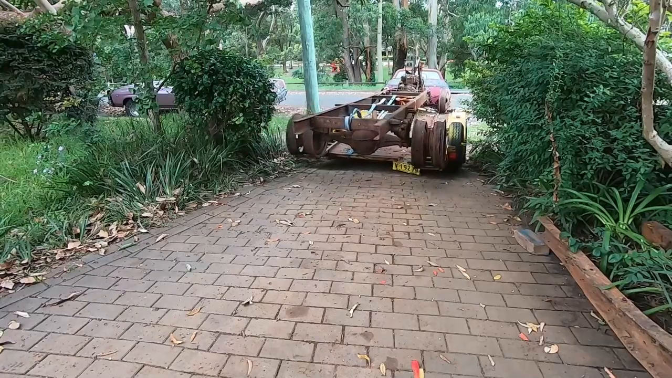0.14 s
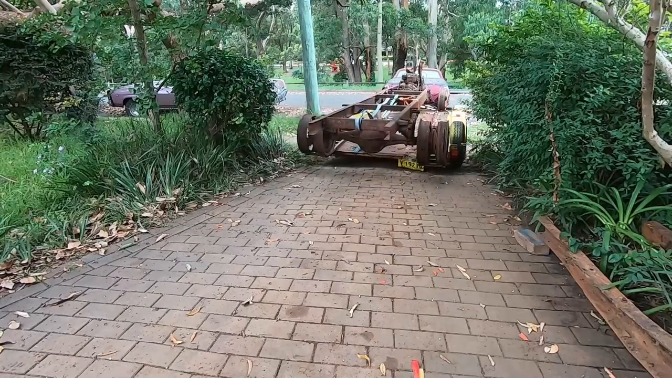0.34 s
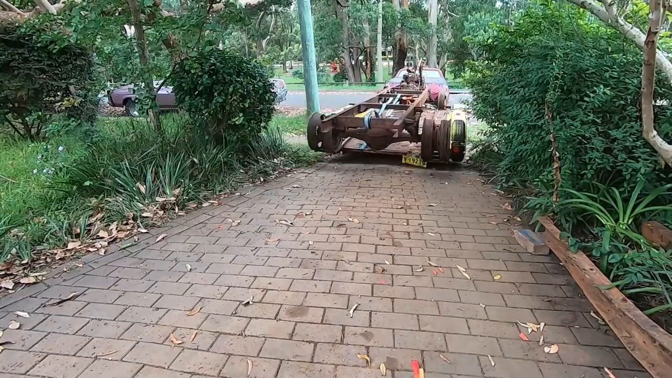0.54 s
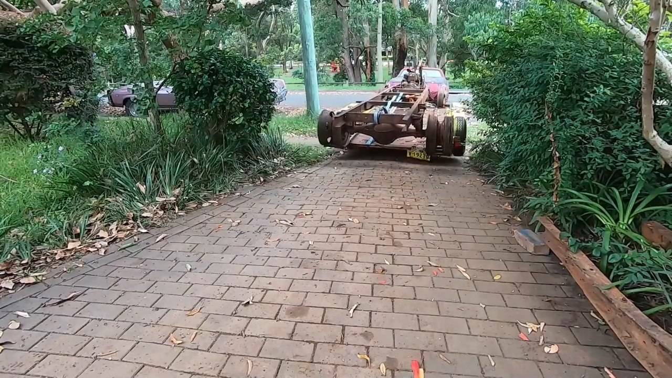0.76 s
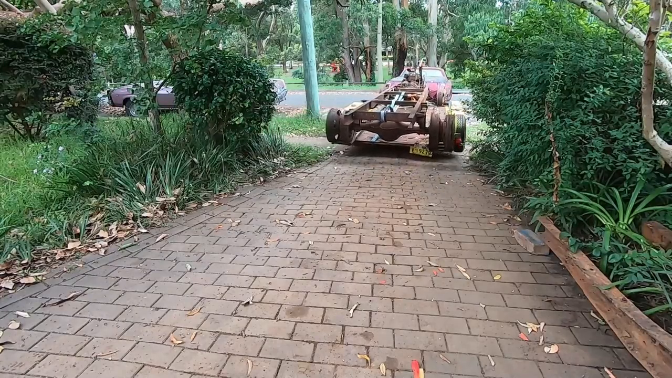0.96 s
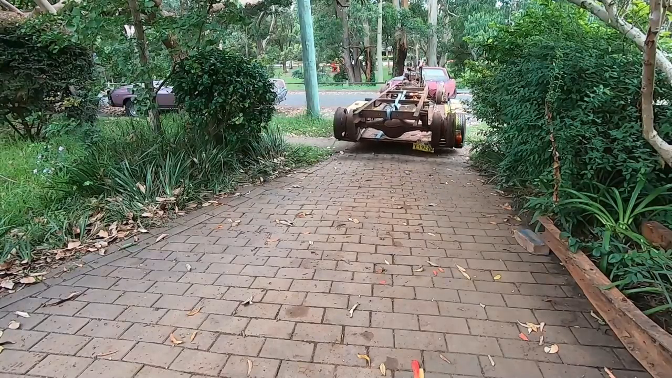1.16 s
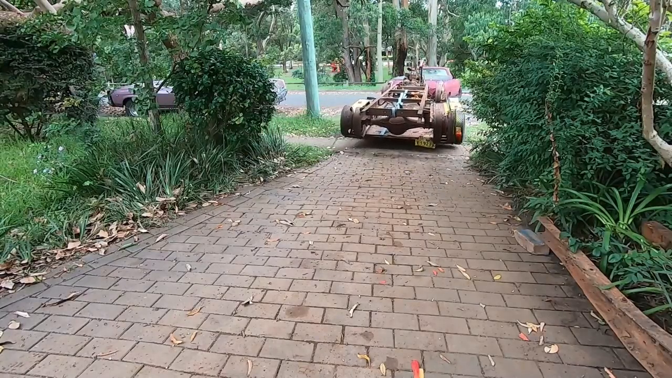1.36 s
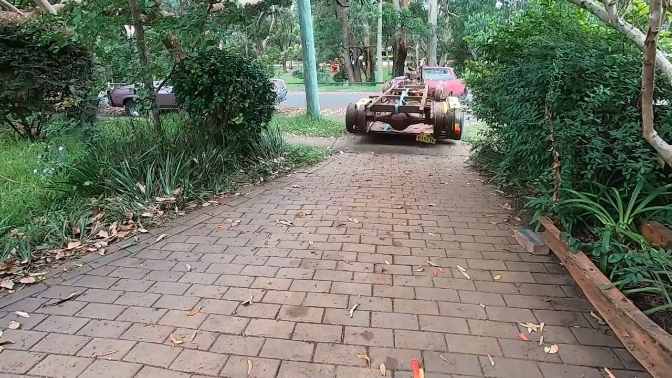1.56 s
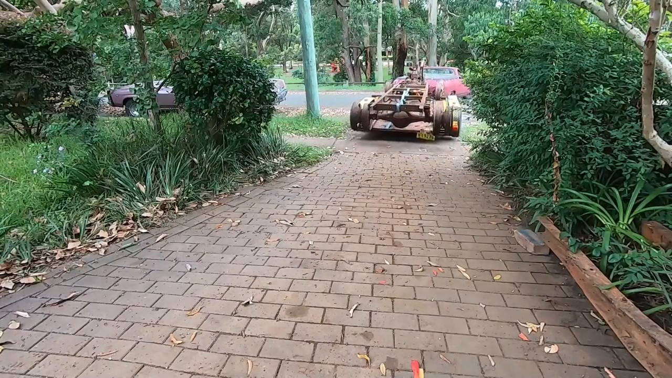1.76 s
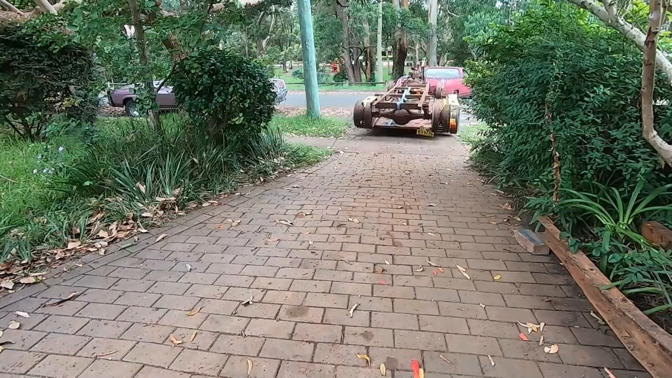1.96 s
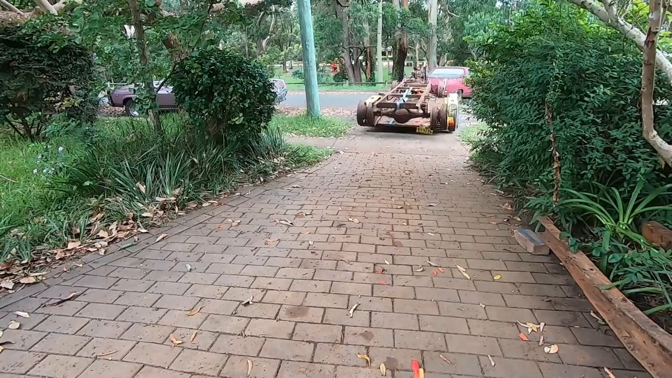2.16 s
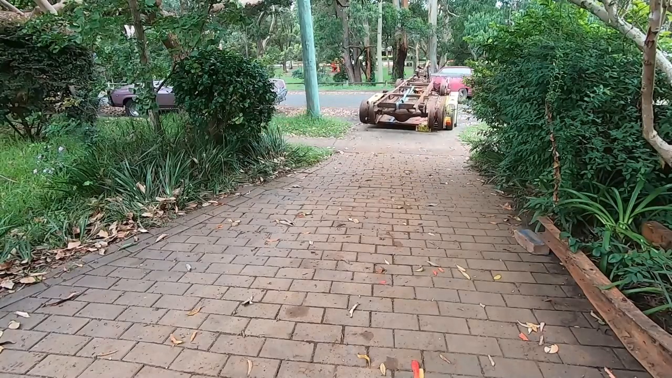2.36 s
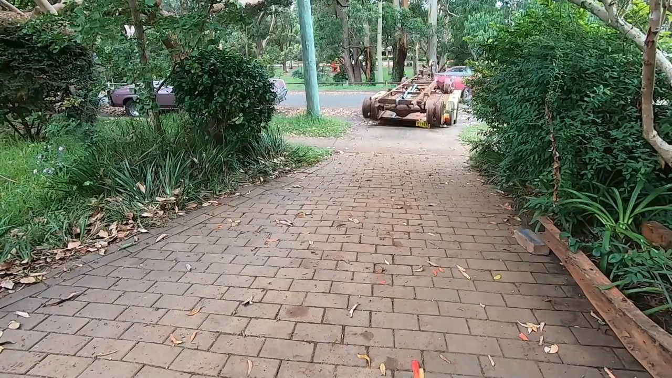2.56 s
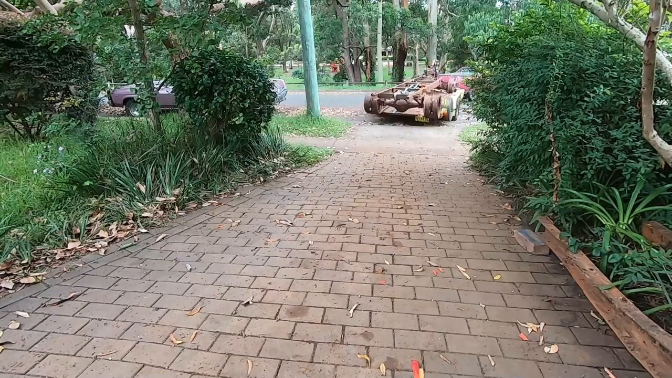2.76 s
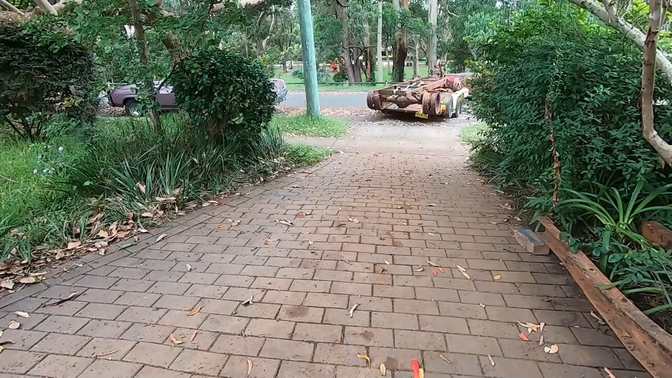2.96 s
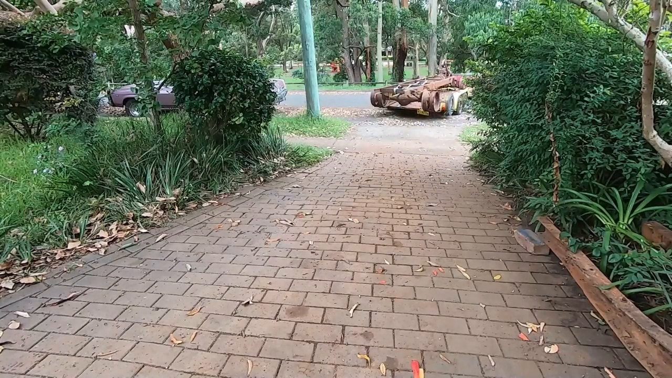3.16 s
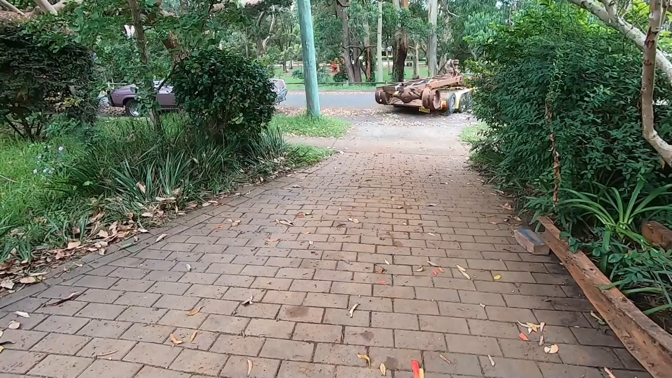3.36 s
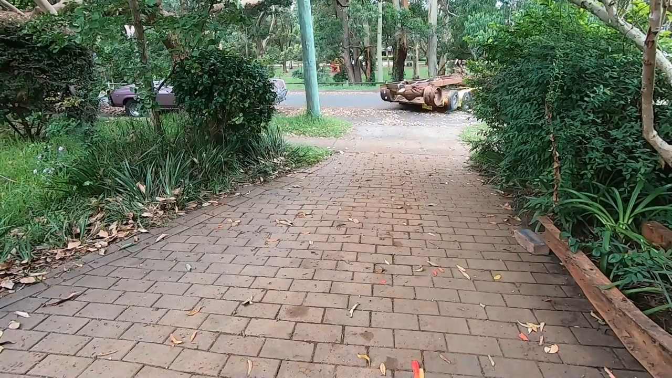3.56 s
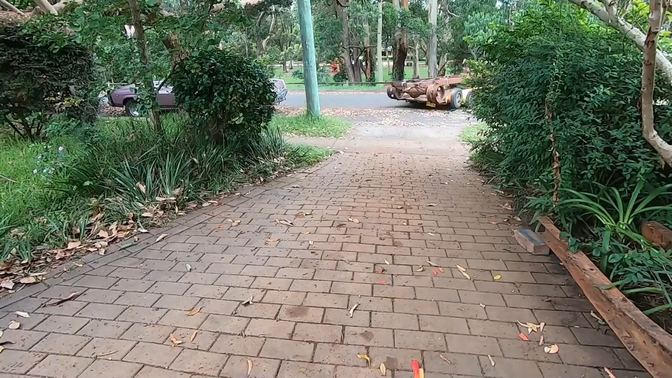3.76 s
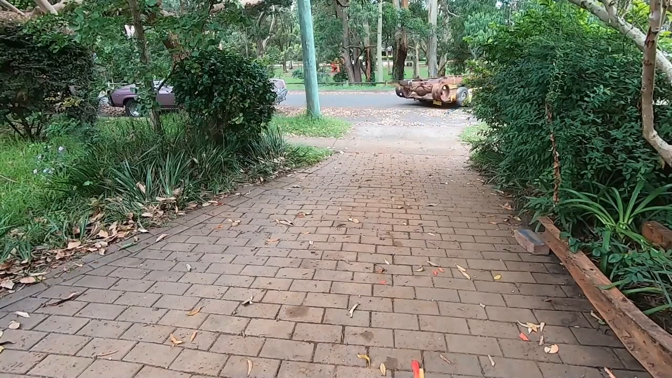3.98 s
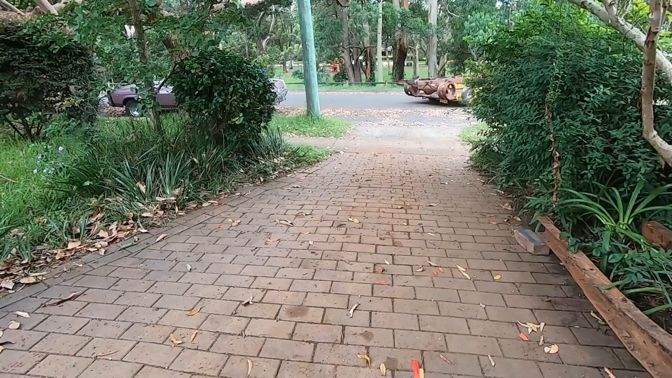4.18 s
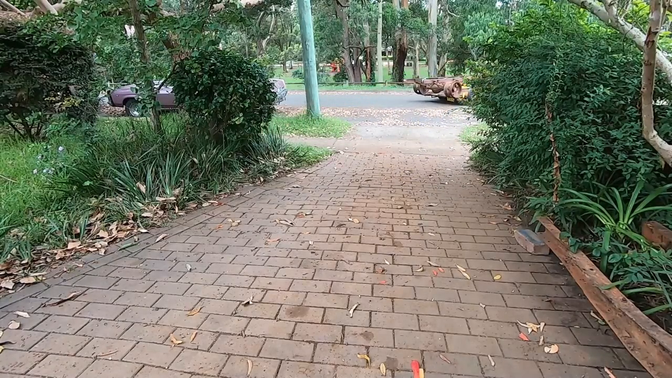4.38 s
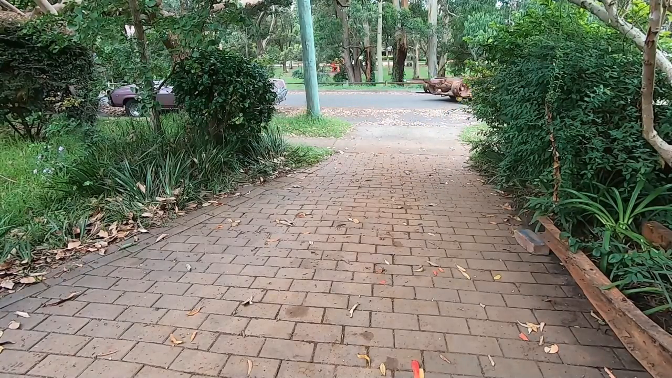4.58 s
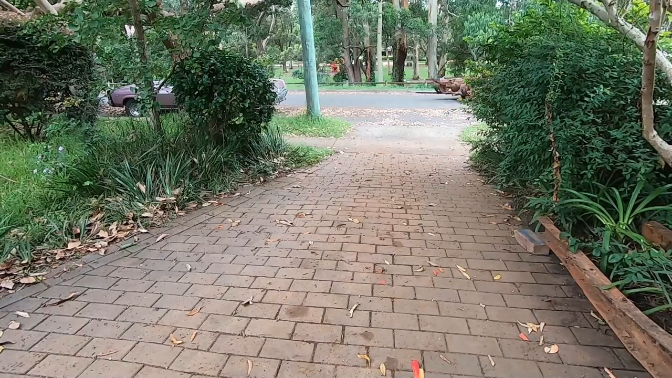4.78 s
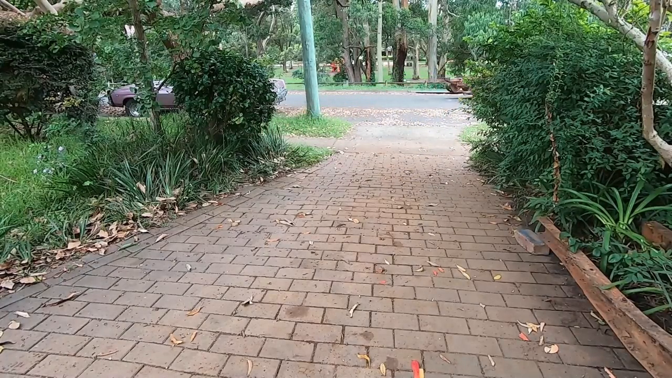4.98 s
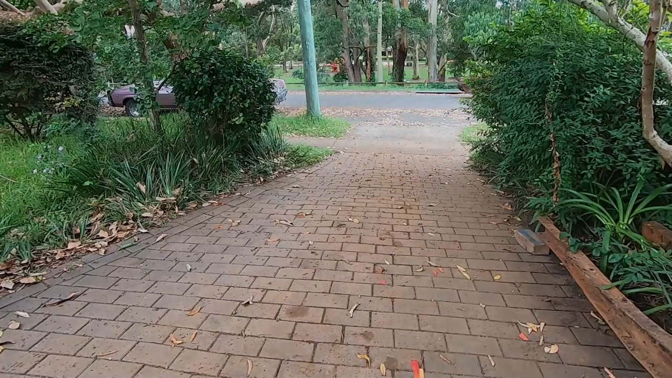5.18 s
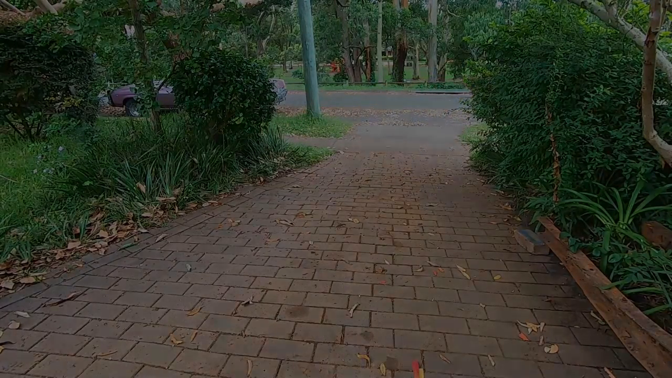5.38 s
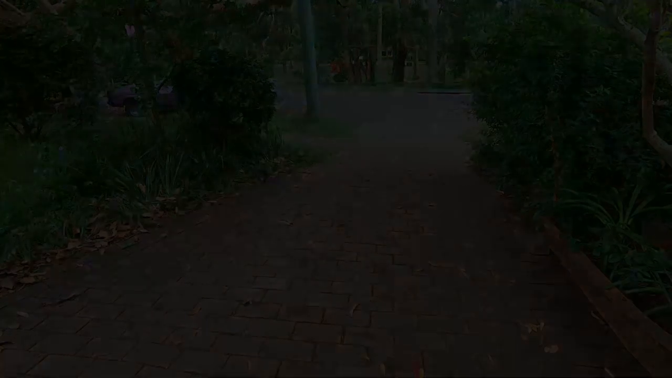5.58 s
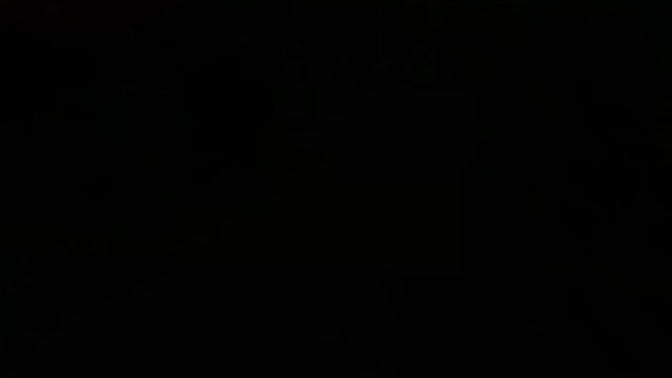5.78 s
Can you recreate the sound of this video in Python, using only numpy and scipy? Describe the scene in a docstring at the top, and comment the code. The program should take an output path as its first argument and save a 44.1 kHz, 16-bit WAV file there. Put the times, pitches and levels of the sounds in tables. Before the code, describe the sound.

A stationary microphone faces a departing truck and trailer, with light air gusts. Deep uneven exhaust pulses dominate, with a raspy leak ticking once per engine cycle. The trailer rolls with slight squeaks and thuds, then crashes and chatters over the kerb in a short burst. Tyres crackle on grit, the engine pulls harder onto the street, and the sound recedes to the end with little echo.

```python
"""The exhaust of a lumpy V8, little above idle, throbs and ticks once an engine cycle as pulses ring its pipes.
It starts 10.9 m ahead of the microphone and tows a steel trailer down a paved driveway and along the street.
The trailer clanks and rattles hard as it drops over the kerb: struck modes of frame, springs and a fitting.
Filtered noise makes the hiss of fan and tyres, the grit and stones, and the light air at the microphone."""
import sys
import numpy as np
from scipy import signal
from scipy.fft import rfft, irfft
from scipy.io import wavfile
from scipy.ndimage import uniform_filter1d

SR = 44100
rng = np.random.default_rng(int(sys.argv[2]) if len(sys.argv) > 2 else 0)


def to_wav(s):
    """Save 16-bit WAV."""
    ch = np.atleast_2d(s).T  # columns
    pcm = np.round(np.clip(ch, -1, 1) * 32767)  # PCM
    wavfile.write(sys.argv[1], SR, pcm.astype(np.int16))


N = 257084
TIME = np.arange(N) / SR  # s

# Distance at the start in m and road speed away from the microphone in m/s.
START_M, AWAY_M_PER_S = 10.9, 3.12
# Times in s: the wheels reach the street; the truck, then the trailer, pass behind the hedge.
STREET_S, TRUCK_HIDDEN_S, TRAILER_HIDDEN_S = 2.46, 3.52, 5.03
# The hardest pull, up onto the street: middle and half length in s.
PULL_S, PULL_HALF_S = 3.31, 0.47
EDGE_HZ = 15850  # upper band limit of the recorder

# Gusts at the microphone. Each row: middle in s, half length in s, level in dB (on top of the calm air).
GUSTS = [(0.34, 0.36, -29), (2.405, 0.46, -27.5)]
# Scattered sound that differs between the ears. Each row: frequency in Hz, gain in dB.
SCATTER_SPECTRUM = [(30, -39), (80, -63), (150, -21.5), (250, -27.5), (500, -25), (2000, -38),
                    (8000, -31.5), (14000, -30)]
# Dull roar of fan and tyres. Each row: frequency in Hz, relative level in dB.
ROAR_SPECTRUM = [(25, -25), (60, 9), (120, 5.5), (200, 4), (300, -0.5), (450, -2.5), (680, -4), (900, -9.5),
                 (1600, -13.5), (3000, -15.5), (6000, -38.5)]
# Hiss of fan and tyres, also of the scrape. Each row: frequency in Hz, relative level in dB.
HISS_SPECTRUM = [(500, -7.5), (1500, -5.5), (3000, -3), (5200, 0), (6300, -4.5), (8500, -4.5),
                 (10200, -13.5), (13000, -16.5), (16000, -30)]
# Exhaust leak, also the grit. Each row: frequency in Hz, relative level in dB.
TICK_SPECTRUM = [(300, -11.5), (1100, -3.5), (1700, 2), (2050, -2.5), (2280, 6.5), (2600, -4.5),
                 (3200, -1.5), (5000, -11), (9000, -21), (16000, -47)]
# A stone popping under a tyre. Each row: frequency in Hz, relative level in dB.
STONE_SPECTRUM = [(500, -19.5), (1100, 0.5), (1700, 1), (2500, -4.5), (4500, -12.5), (9000, -14.5),
                  (16000, -40)]
# Rubbing squeaks as the trailer starts to roll. Each row: start in s, length in s, starting pitch in Hz,
# level of the upper partial in dB.
SQUEAKS = [(0.17, 0.21, 660, -48), (0.45, 0.21, 2030, -51.5), (0.67, 0.17, 2170, -57),
           (0.88, 0.09, 2930, -52.5)]
# Crowded modes of the trailer steel. Each row: frequency in Hz, relative level in dB.
STEEL_SPECTRUM = [(100, 1), (300, -3), (430, -4.5), (600, 0.5), (800, 2.5), (980, -1), (1350, 3),
                  (2000, -2.5), (3100, -2), (4000, -1), (6300, -6), (8300, -2.5), (10200, -15.5),
                  (12500, -17.5), (16000, -27)]
# Trailer clanks. Each row: start in s, level in dB, brightness in dB per octave, chatter decay in s.
CLANKS = [(0.19, -40.5, 2, 0.0045), (0.627, -47, 0, 0.0079), (1.258, -52, 1.5, .005),
          (1.514, -52.5, 3, 0.0022), (1.521, -55, 0, .002), (1.725, -60, 5, 0.027),
          (1.964, -43.5, -1.5, 0.047), (2.101, -15.5, 3.5, 0.0075), (2.117, -20, -0.1, 0.016),
          (2.189, -26, -2, 0.017), (2.235, -21, -1, 0.018), (2.276, -30.5, -3.5, 0.014),
          (2.320, -33, -4, 0.065), (2.392, -34.5, -6, 0.017), (2.416, -27.5, -1.3, 0.0083),
          (2.487, -26, -1.5, 0.031), (2.538, -25.5, -1, 0.0076), (2.565, -36.5, 4.5, 0.0084),
          (2.715, -45.5, -2, 0.033), (3.786, -51.5, 2.5, 0.011), (3.843, -51, -2.5, .002)]
# Strongest rings of the trailer frame. Each row: frequency in Hz, relative level in dB, 60 dB decay in s.
FRAME_MODES = [(556, -16.5, 0.35), (788, -15, 0.36), (864, -32, 0.3), (1229, -7, 0.18), (1394, -13.5, 0.24),
               (1620, -20, .3), (1756, -13, .25), (2230, -16, 0.28), (2782, -12, .3), (3470, -26, 0.23),
               (4370, -35, 0.26), (5430, -11, 0.2), (7110, -23, 0.3), (7720, -14, 0.17)]
# A loose steel fitting, scraped just before the drop. Each row: frequency in Hz, width in Hz,
# relative level in dB, 60 dB decay in s.
FITTING_MODES = [(2250, 81, -11, 0.32), (2776, 600, 2, 0.27), (4150, 500, -12, 0.15), (4500, 180, -2, 0.32),
                 (5650, 300, -14, 0.18), (7630, 770, 1.5, 0.12), (10230, 190, -5, 0.26),
                 (13300, 200, -12, 0.28)]
# Thuds of the suspension. Each row: start in s, level in dB, pitch ratio.
THUDS = [(0.168, -25.5, 1.72), (1.524, -27, 1.1), (2.15, -23.5, 1.02), (2.243, -14, 0.99)]
# Rings of the suspension at pitch ratio 1. Each row: frequency in Hz, relative level in dB, 60 dB decay in s.
SPRING_MODES = [(301, -8.5, 0.1), (343.6, -9.5, 0.23), (378, -7.5, 0.084), (507, -22.5, 0.15)]
# Engine speed: sags on the driveway, picks up for the street. Each row: time in s, speed in rpm.
ENGINE_SPEED = [(0.0, 904.9), (0.32, 853.6), (0.41, 777.9), (1.35, 738.4), (1.58, 666.8), (2.18, 769.6),
                (2.89, 759.4), (3.68, 861.1), (4.8, 962.6), (5.32, 906.2), (5.83, 940.4)]
# Cylinders in firing order. Each row: pipe length from 0 (short bank) to 1 (long bank), strength in dB.
CYLINDERS = [(0.98, -0.5), (0.22, 3.5), (0.034, 3), (0.94, -0.5), (0.23, 3), (0.97, 4.5), (1, 0.5),
             (0, 3.5)]
# Exhaust pipes and silencer. Each row: frequency in Hz, relative gain in dB.
PIPE_SPECTRUM = [(20, -31), (36, 2.5), (50, 2.5), (65, -5.5), (80, -1), (96, 11), (113, -3), (148, -18),
                 (186, 0.5), (222, -19.5), (275, -11), (420, -31.5), (900, -43.5), (4000, -88)]


def amp(db):
    """Amplitude ratio of a level in dB."""
    return 10 ** (np.asarray(db) / 20)


def unit(x):
    """The same sound at rms 1."""
    return x / np.sqrt(np.mean(x ** 2) + 1e-20)


def curve(rows):
    """Rows of (s, value), joined by straight lines in time."""
    return np.interp(TIME, *np.transpose(rows))


def add(mix, start_s, sound):
    """Lays a sound into the mix in place, cut off at the end."""
    part = mix[round(start_s * SR):][:len(sound)]
    part += sound[:len(part)]


def colour(x, points):
    """Causal minimum-phase filter with the given (Hz, dB) spectrum."""
    hz, db = np.transpose(points)
    grid = abs(np.fft.fftfreq(2 ** 15, 1 / SR))
    log_gain = np.log(amp(np.interp(np.log(grid + 1), np.log(hz), db)))
    response = np.fft.ifft(np.exp(signal.hilbert(log_gain).conj())).real
    return signal.fftconvolve(x, response[:len(grid) // 2])[:len(x)]


def band(x, low_hz, high_hz):
    """Band-pass with no delay."""
    sos = signal.butter(3, [low_hz, high_hz], "bandpass", fs=SR, output="sos")
    return signal.sosfiltfilt(sos, x)


def drift(rate_hz):
    """Slow random wander of rms 1, strongest near the given rate."""
    hz = np.fft.rfftfreq(N, 1 / SR)
    gain = hz / (rate_hz + hz) / (1 + (hz / rate_hz) ** 4)
    return unit(irfft(rfft(rng.standard_normal(N)) * gain, N))


def patchy(x, depth_db):
    """Lets patches of the spectrum swell and sink for a few hundredths of a second."""
    z = signal.stft(x, nperseg=512)[2]
    patches = uniform_filter1d(rng.standard_normal(z.shape), size=9, axis=0)  # across frequency
    patches = uniform_filter1d(patches, size=7, axis=1)  # across time
    return signal.istft(z * amp(depth_db * unit(patches)))[1][:N]


def ring(modes, t):
    """Dying sines of a struck object, each from a random phase."""
    return sum(amp(db - 60 * t / t60) * np.sin(2 * np.pi * (hz * t + rng.random()))
               for hz, db, t60 in modes)


def swell(middle_s, half_s):
    """A smooth rise to 1 and fall back towards 0."""
    return np.exp(-((TIME - middle_s) / half_s) ** 2)


def distance_db():
    """Sound spreads as the truck draws away at a steady pace."""
    return -20 * np.log10(1 + AWAY_M_PER_S * TIME / START_M)


def hedge_db(hidden_s, loss_db_per_s):
    """The shadow of the hedge deepens steadily once a source has passed behind it."""
    return -loss_db_per_s * np.maximum(TIME - hidden_s, 0)


def on_street(crossing_s=0.16):
    """Share of the wheels on the street: near 0 on the pavers, near 1 past the kerb."""
    return .5 + .5 * np.tanh((TIME - STREET_S) / crossing_s)


def breeze(calm_db=-40.0):
    """Slow pressure swells at the microphone, stronger in the gusts."""
    gusts = sum(amp(db) * swell(s, half_s) for s, half_s, db in GUSTS)
    return (amp(calm_db) + gusts) * unit(drift(5.86) + 0.098 * drift(22))


def garden(x, t60=0.69, wet_db=-15.5):
    """Hedges and trees scatter a short tail, from 15 ms after the direct sound."""
    t = TIME[:SR]
    noise = rng.standard_normal(len(t)) * amp(-60 * t / t60) * (t > .015)
    tail = colour(noise, [(200, 0), (2000, 1.0), (8000, -1.0), (16000, 0.0)])
    return amp(wet_db) * signal.fftconvolve(x, tail / np.linalg.norm(tail))[:N]


def rolling(roar_db=-43.5, hiss_db=-56.5, street_db=5.5, street_fade_db_per_s=3.5, grit_db=-10.5,
            grains_per_s=110):
    """Fan and tyres roar dully and hiss, louder on the rough street; grit crackles under the wheels."""
    roar = unit(patchy(colour(rng.standard_normal(N), ROAR_SPECTRUM), depth_db=0.47))
    hiss = unit(patchy(colour(rng.standard_normal(N), HISS_SPECTRUM), depth_db=1.84))

    grain_strength = amp(2.3 * np.minimum(rng.exponential(1, N), 4))
    grains = (rng.random(N) < grains_per_s / SR) * grain_strength
    t = TIME[:SR // 20]
    crackle = rng.standard_normal(len(t)) * np.exp(-t / 0.0024)
    grit = unit(colour(signal.fftconvolve(grains, crackle)[:N], TICK_SPECTRUM))

    # the hiss jumps on reaching the street, then the jump fades
    rough_db = on_street() * (street_db - street_fade_db_per_s * (TIME - STREET_S))
    roar_gain = amp(roar_db + hedge_db(TRUCK_HIDDEN_S, loss_db_per_s=4.5))
    hiss_gain = amp(hiss_db + rough_db + hedge_db(TRAILER_HIDDEN_S, loss_db_per_s=3.0))
    return roar_gain * roar + hiss_gain * (hiss + amp(grit_db) * grit)


def gravel(stones_per_s=230, spread_db=1.4, level_db=-56.5):
    """Loose stones pop under the tyres from the street edge on: randomly timed, dying noise bursts."""
    stone_strength = amp(spread_db * np.minimum(rng.exponential(1, N), 3))
    pops = (rng.random(N) < stones_per_s / SR) * stone_strength
    t = TIME[:SR // 20]
    bursts = signal.fftconvolve(pops, np.exp(-t / 0.0092))[:N] * rng.standard_normal(N)
    gain = on_street() * amp(level_db + hedge_db(TRAILER_HIDDEN_S, loss_db_per_s=19))
    return gain * unit(colour(bursts, STONE_SPECTRUM))


def squeal(rise_octaves_per_s=0.22, waver=0.007, lower_db=-8.0):
    """Each faint squeak swells, creeps up in pitch and dies; a weaker partial sounds a minor third below."""
    out = np.zeros(N)
    for start_s, length_s, hz, db in SQUEAKS:
        t = TIME[:round(length_s * SR)]
        pitch = hz * 2 ** (rise_octaves_per_s * t) * (1 + waver * drift(40)[:len(t)])
        phase = 2 * np.pi * np.cumsum(pitch) / SR
        tone = np.sin(phase) + amp(lower_db) * np.sin(phase * 5 / 6)
        envelope = np.sqrt(abs(np.sin(np.pi * t / length_s)))
        add(out, start_s, amp(db) * envelope * tone)
    return out


def scrape(length_s=.3):
    """Rough sliding contact keeps the resonances of the fitting fuzzy while they die away."""
    t = TIME[:round(length_s * SR)]
    sound = 0.57 * unit(colour(rng.standard_normal(len(t)), HISS_SPECTRUM)) * np.exp(-t / 0.081)
    for hz, width_hz, db, t60 in FITTING_MODES:
        # a random walk of the phase widens the line
        wander = np.cumsum(rng.standard_normal(len(t))) * np.sqrt(np.pi * width_hz / SR)
        sound = sound + amp(db - 60 * t / t60) * np.sin(2 * np.pi * hz * t + wander)
    return sound * (1 - np.exp(-t / 0.0019))


def clank(level_db, tilt_db, chatter_s, low_t60=0.34, high_t60=0.16, ring_db=-5.0):
    """A blow and its quick chatter excite the crowded modes of the steel frame."""
    t = TIME[:SR // 2]
    # noise that dies faster in the treble stands for the crowd of modes
    hz, s, z = signal.stft(rng.standard_normal(len(t)), SR, nperseg=128)
    octave = np.log2(np.maximum(hz, 400) / 2000)[:, None]
    t60 = np.interp(octave, [-2, 2], [low_t60, high_t60])
    dying = signal.istft(z * amp(tilt_db * octave - 60 * s / t60))[1][:len(t)]
    crowd = colour(dying, STEEL_SPECTRUM)

    early = SR // 50  # 20 ms
    tilted_modes = [(f, db + tilt_db * np.log2(f / 2000), life) for f, db, life in FRAME_MODES]
    body = crowd / np.std(crowd[:early]) + amp(ring_db) * ring(tilted_modes, t)

    touching = rng.random(len(t)) < 1500 / SR  # 1500 contacts a second
    contacts = rng.standard_normal(len(t)) * touching * np.exp(-t / chatter_s)
    contacts[0] = 2.77  # the first blow
    sound = signal.fftconvolve(contacts, body)[:len(t)] * (1 - np.exp(-t / 0.00059))
    loudest_power = uniform_filter1d(sound ** 2, early).max()
    return amp(level_db) * sound / np.sqrt(loudest_power)


def trailer(scrape_s=2.015, scrape_db=-33.0):
    """Clanks of the frame, thuds of the springs and one scraping fitting."""
    out, t = np.zeros(N), TIME[:SR // 2]
    for start_s, level_db, tilt_db, chatter_s in CLANKS:
        add(out, start_s, clank(level_db, tilt_db, chatter_s))
    for start_s, level_db, ratio in THUDS:
        modes = [(hz * ratio, db, t60) for hz, db, t60 in SPRING_MODES]
        soft_onset = 1 - np.exp(-t / 0.0056)
        add(out, start_s, amp(level_db) * ring(modes, t) * soft_onset)
    add(out, scrape_s, amp(scrape_db) * scrape())
    return out


def engine_cycles(start=0.0323):
    """Four-stroke cycles turned so far: one for every two revolutions."""
    return start + np.cumsum(curve(ENGINE_SPEED)) / SR / 120


def leak(cycles, opens=0.3, fall=0.079, level_db=-43.5, pull_db=6.0):
    """One cylinder spits through a small exhaust leak once a cycle, harder under load."""
    age = (cycles - opens) % 1  # in cycles, like the rise and fall
    spit = (1 - np.exp(-age / 0.027)) * (np.exp(-age / fall) + 0.16 * np.exp(-age / 0.37))
    load_db = pull_db * swell(PULL_S, PULL_HALF_S)
    gain = amp(level_db + load_db + hedge_db(TRUCK_HIDDEN_S, loss_db_per_s=9.0))
    return gain * spit * unit(colour(rng.standard_normal(N), TICK_SPECTRUM))


def exhaust(cycles, long_pipe_s=0.00392, uneven_db=1.63, boom_db=7.0, honk_db=5.0, bark_db=1.9,
            level_db=-29.0, lope_s=7.0, jitter_s=0.0004):
    """Eight firings a cycle leave by two banks; the uneven pattern throbs in the pipe resonances."""
    firing = np.floor(cycles * len(CYLINDERS)).astype(int)
    at = np.flatnonzero(np.diff(firing)) + 1
    bank, db = np.array(CYLINDERS)[firing[at] % len(CYLINDERS)].T
    delay_s = abs(bank * long_pipe_s + jitter_s * (2 + rng.standard_normal(len(at))))
    pulses = np.zeros(N + SR)
    strength = amp(db + uneven_db * rng.standard_normal(len(at)))
    pulses[at + np.round(delay_s * SR).astype(int)] = -strength

    # the engine is already running: one earlier cycle has the pipes ringing
    lead = np.searchsorted(cycles, cycles[0] + 1)
    sound = colour(np.r_[pulses[:lead], pulses[:N]], PIPE_SPECTRUM)[lead:]
    boom, honk, bark = band(sound, 102.7, 157), band(sound, 119, 202), band(sound, 220, 900)

    # the throb swings between two low bands once a cycle, most at the start
    lope = np.exp(-TIME / lope_s)
    boom_gain = amp(boom_db * lope * np.cos(2 * np.pi * (cycles - .53)))
    honk_gain = amp(honk_db * lope * np.cos(2 * np.pi * (cycles - .12)))
    # the bark sinks once the pipes turn away behind the hedge
    bark_gain = amp(bark_db + hedge_db(TRUCK_HIDDEN_S, loss_db_per_s=8.5))
    sound = sound + (boom_gain - 1) * boom + (honk_gain - 1) * honk + (bark_gain - 1) * bark

    mean_power = uniform_filter1d(sound ** 2, size=22050)  # levelled over half a second
    gain = amp(level_db + distance_db() + hedge_db(TRUCK_HIDDEN_S, loss_db_per_s=1.6))
    return gain * sound / np.sqrt(mean_power)


def scene():
    """Everything lies straight ahead; only a trace of scattered sound differs between the ears."""
    cycles = engine_cycles()
    sharp = trailer() + leak(cycles) + squeal() + gravel()
    mid = exhaust(cycles) + rolling() + sharp + garden(sharp)
    scatter = colour(garden(mid, t60=0.32, wet_db=1.5), SCATTER_SPECTRUM)
    return mid + breeze() + np.array([scatter, -scatter])


def record(dry):
    """The recorder's band limit: a steep low-pass with no delay."""
    low_pass = signal.firwin(511, EDGE_HZ, window=("kaiser", 9), fs=SR)
    return signal.oaconvolve(dry, low_pass[None], "same")


dry = scene()
out = record(dry)
to_wav(out)
```